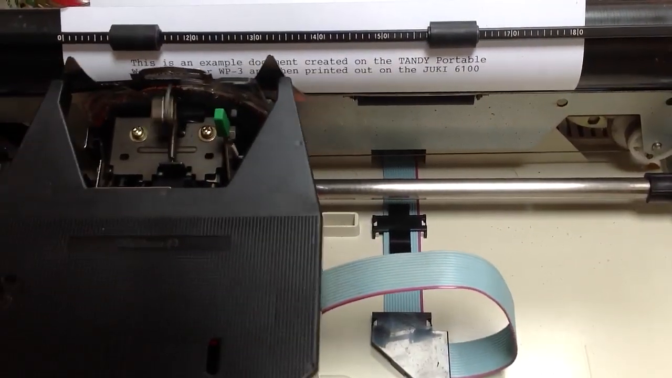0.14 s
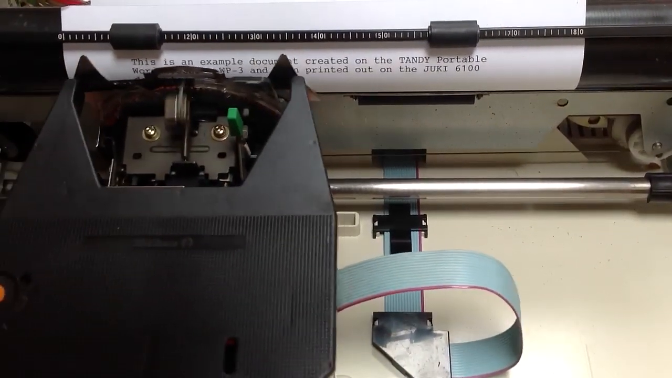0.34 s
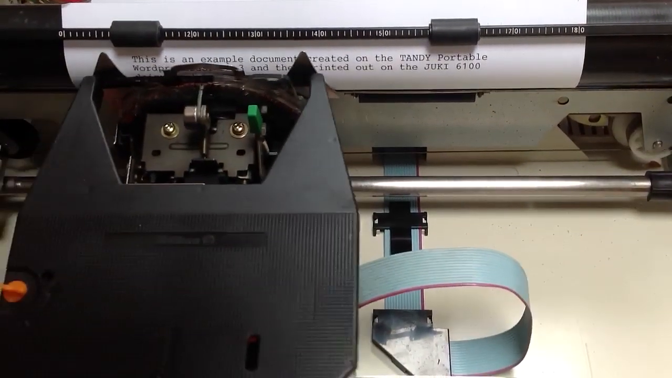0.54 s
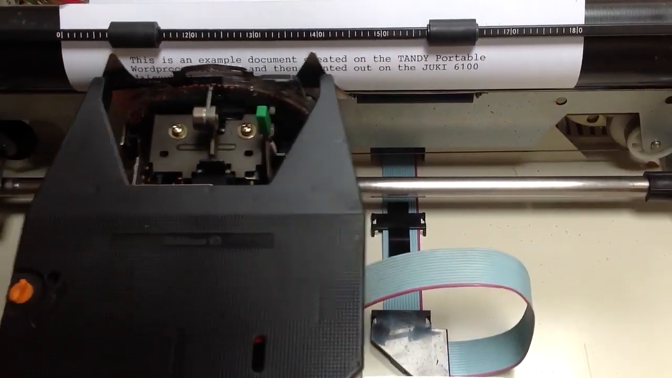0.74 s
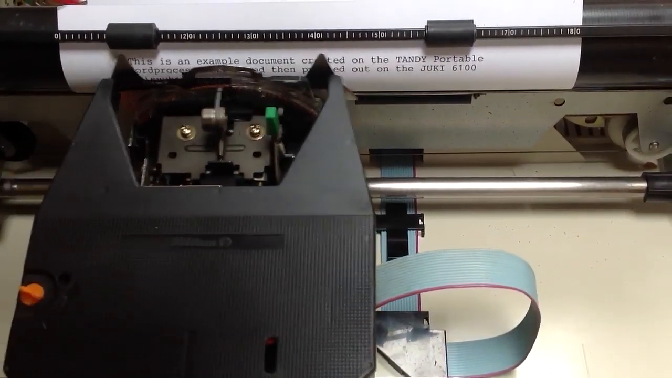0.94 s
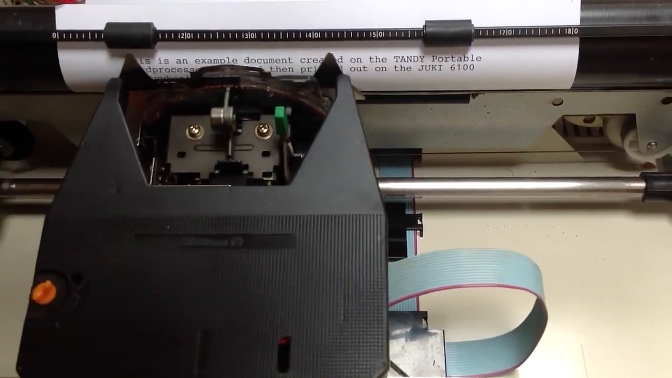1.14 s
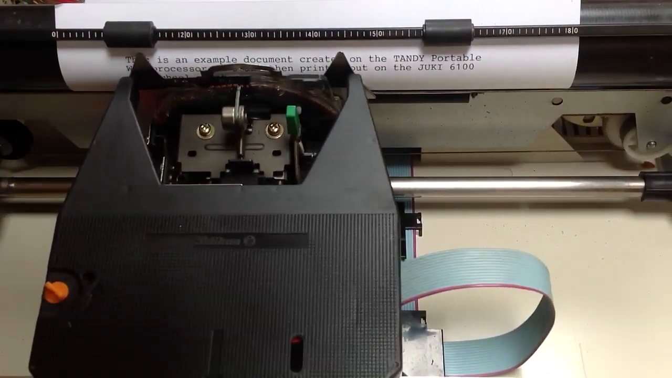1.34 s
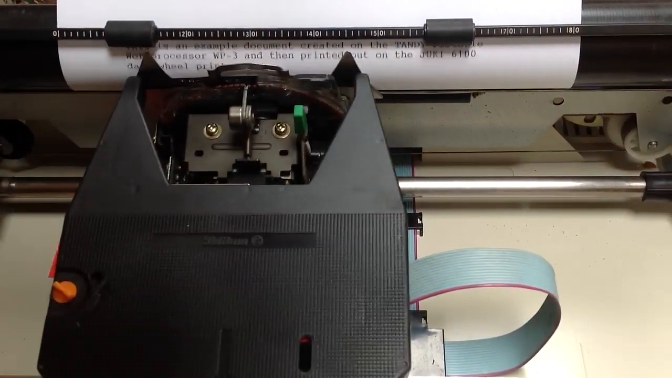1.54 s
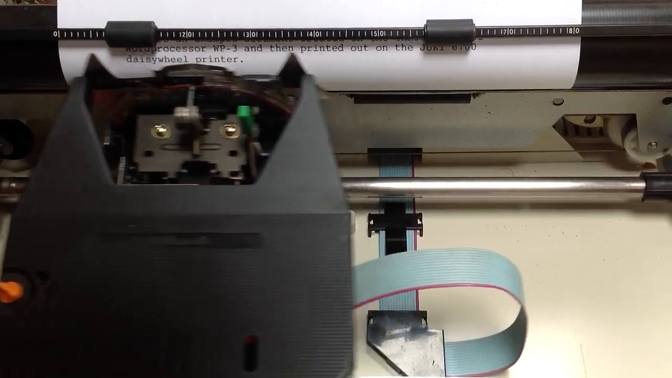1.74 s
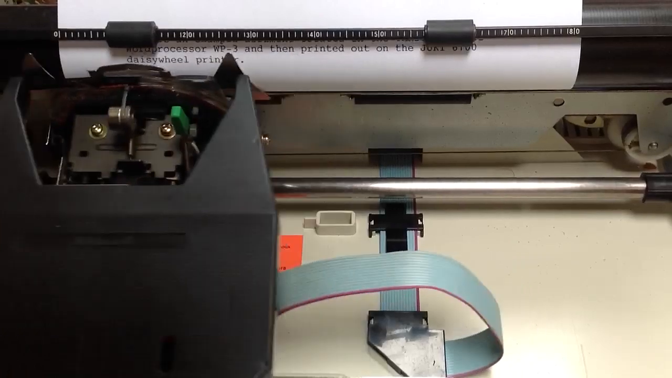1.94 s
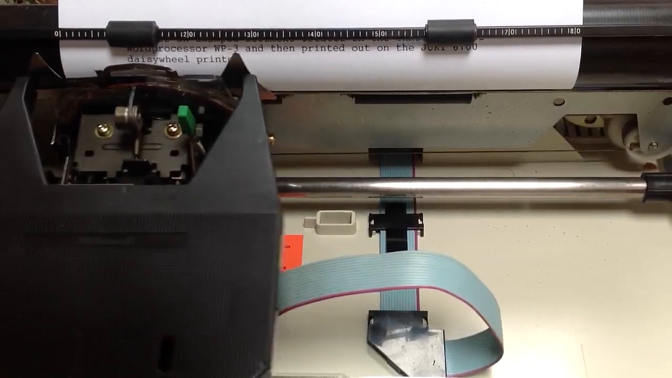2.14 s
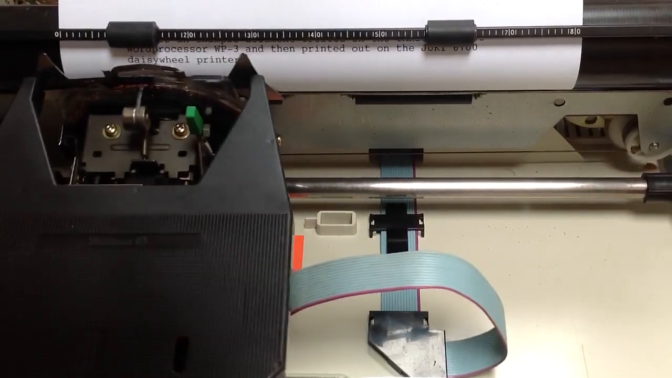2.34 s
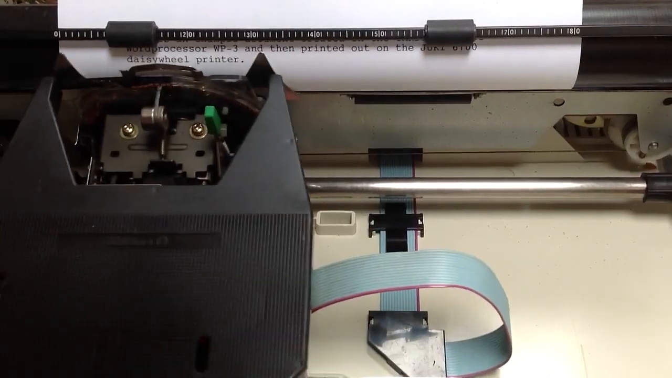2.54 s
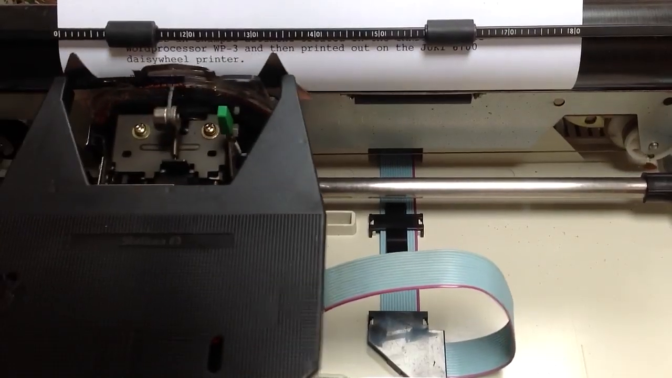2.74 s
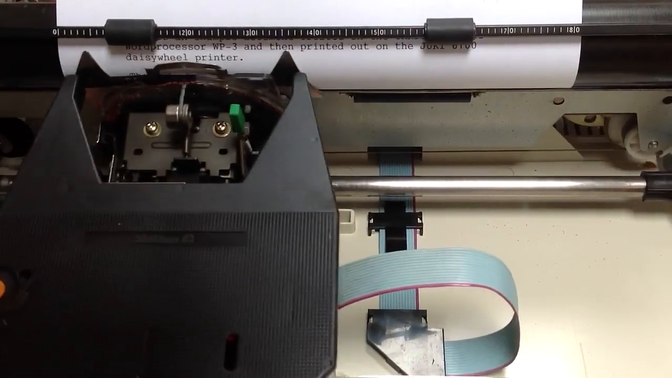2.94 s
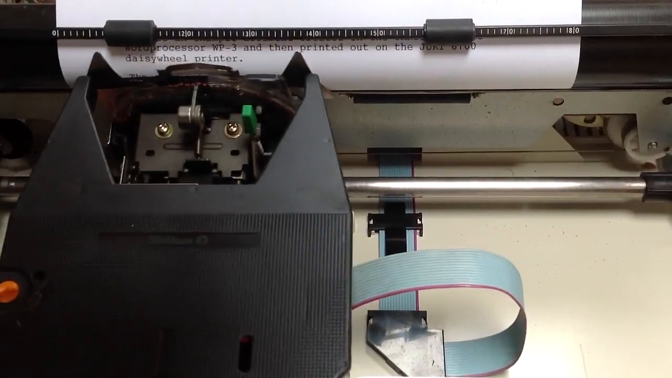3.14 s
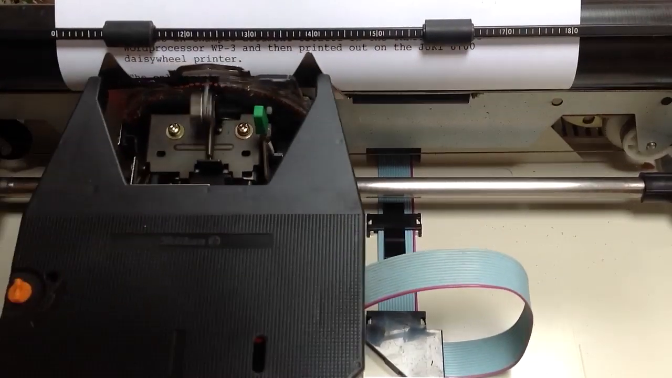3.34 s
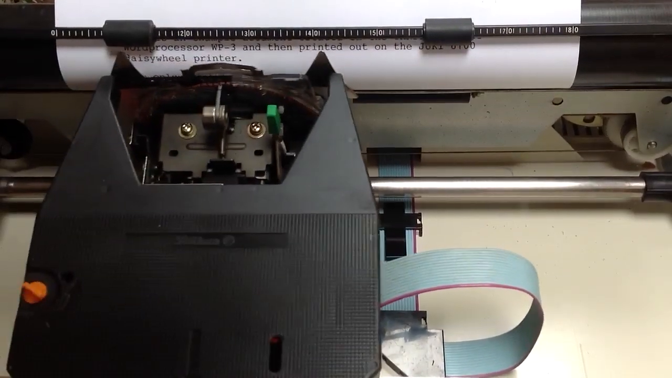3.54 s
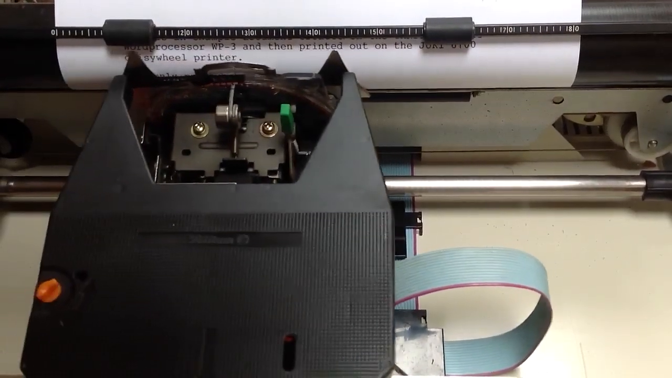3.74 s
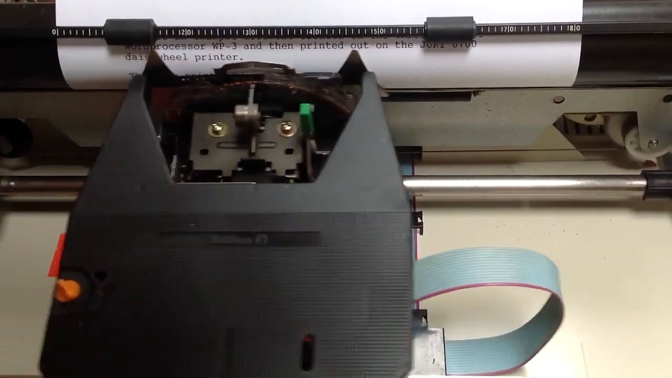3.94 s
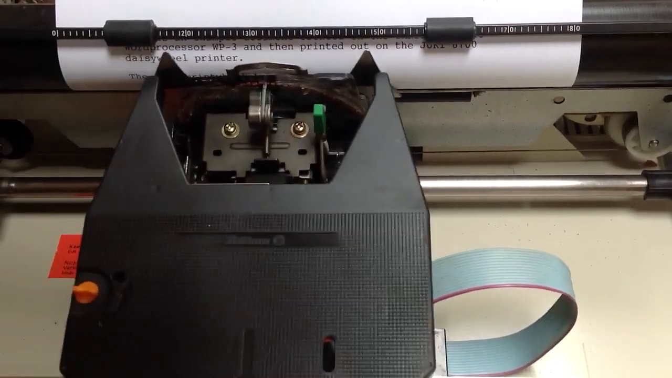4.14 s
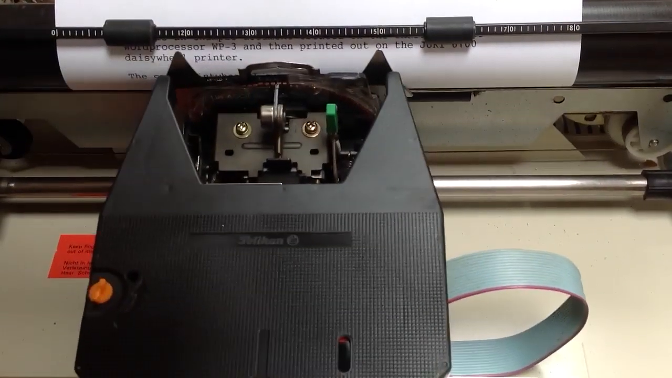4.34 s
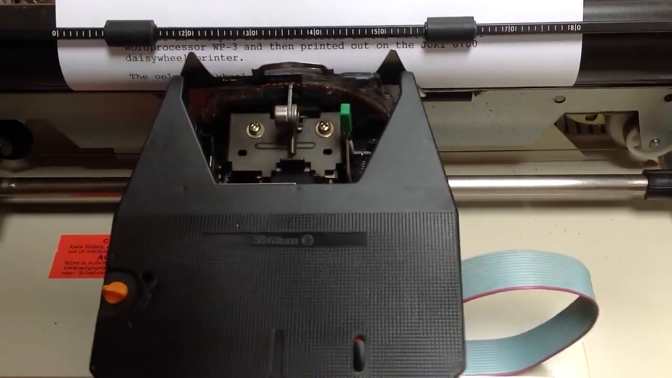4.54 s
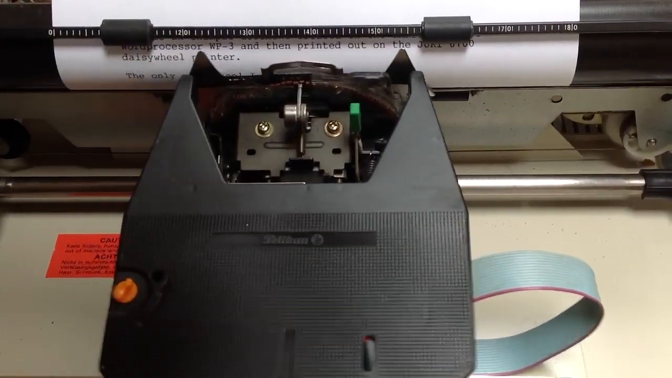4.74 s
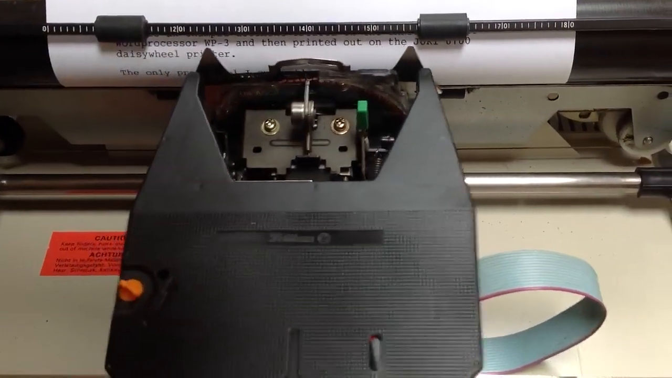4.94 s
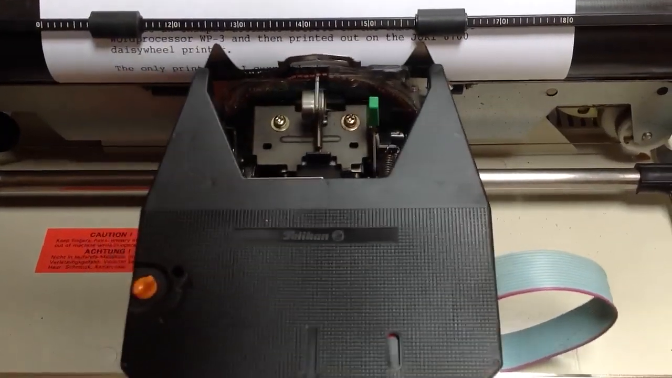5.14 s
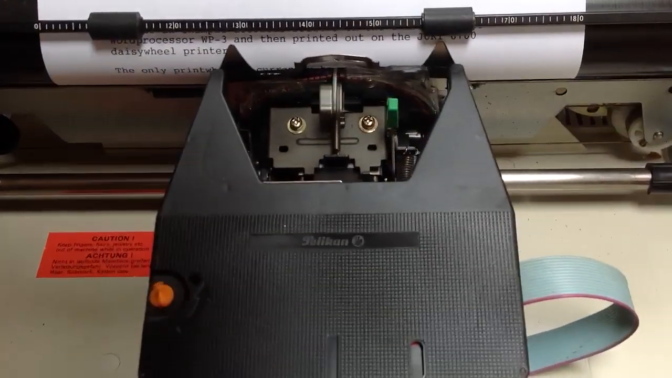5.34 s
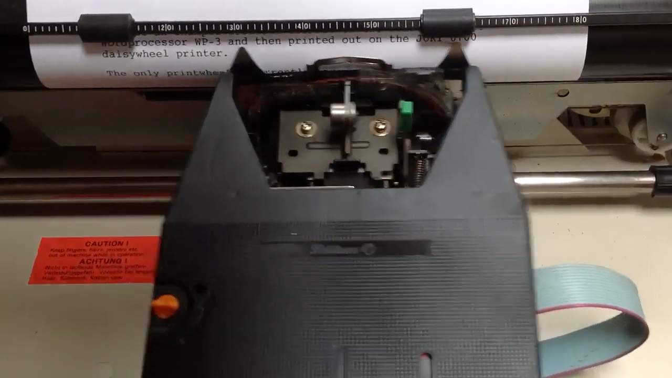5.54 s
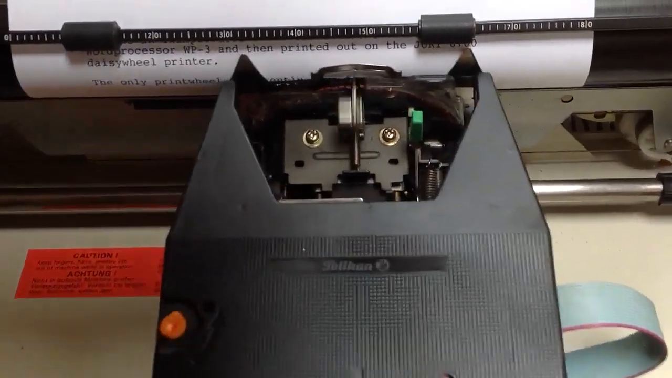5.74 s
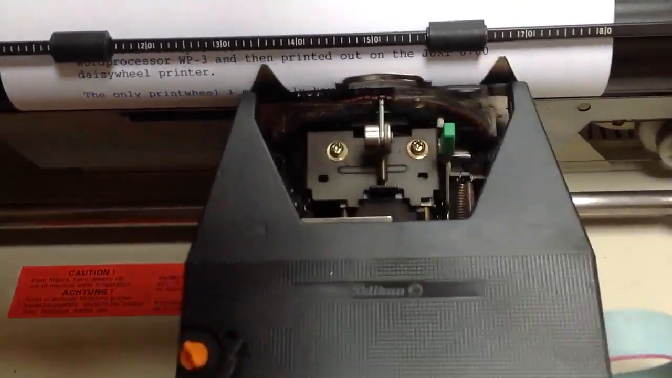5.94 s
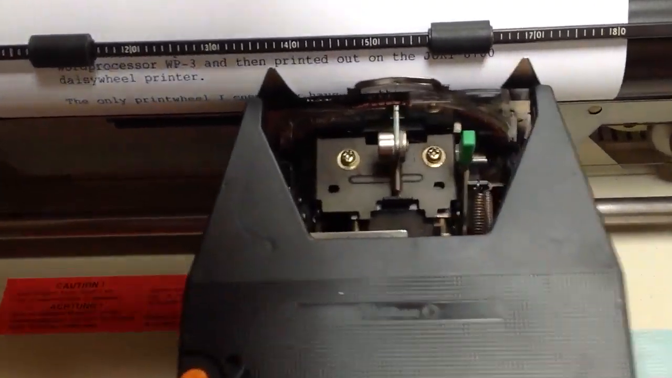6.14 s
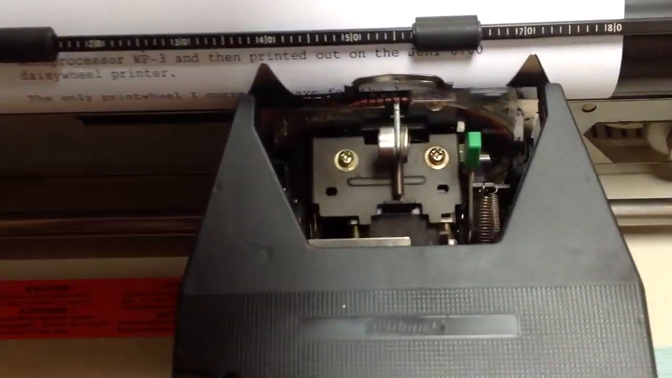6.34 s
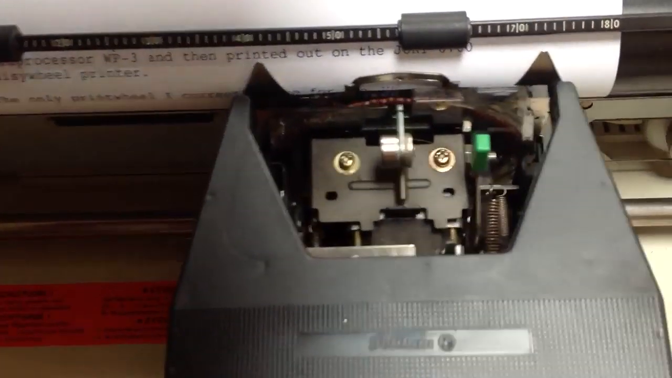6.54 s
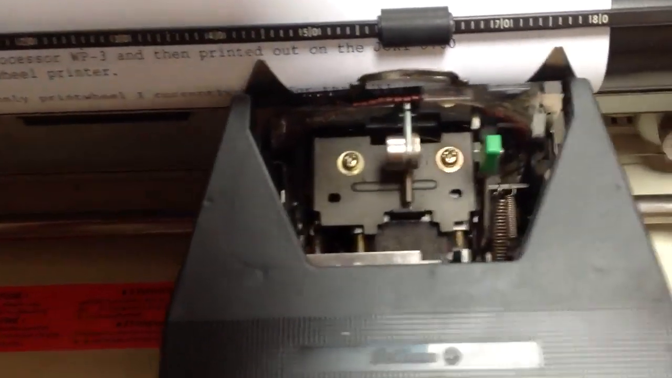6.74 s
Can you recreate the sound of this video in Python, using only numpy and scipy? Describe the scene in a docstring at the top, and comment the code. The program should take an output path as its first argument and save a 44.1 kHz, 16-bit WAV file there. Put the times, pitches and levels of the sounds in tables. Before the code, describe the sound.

Close, bright mechanical typing in quick even runs, with whining servo and carriage rumble, a short line-change gap, then more typing growing louder.

```python
"""A daisywheel printer types two lines of text, close to the microphone in a quiet room, over fan noise.
Line 1: for each letter the carriage rumbles and rubs (noise), the servo sings (swept sine), the mechanism
clicks and the hammer slaps the wheel on the platen and rebounds (coloured bursts, damped modes).
Then the carriage runs back, the paper feeds (swelling chassis noise, one ring), and briefly only the fan is left.
Line 2: typing again, louder towards the end as the microphone nears."""
import sys
import numpy as np
from scipy import signal
from scipy.fft import rfft, irfft, next_fast_len
from scipy.io import wavfile
from scipy.ndimage import uniform_filter1d, map_coordinates

SR = 44100
rng = np.random.default_rng(int(sys.argv[2]) if len(sys.argv) > 2 else 0)


def master(y):
    """Save y as 16-bit WAV."""
    cut = np.clip(np.atleast_2d(y).T, -1, 1)
    pcm = np.round(cut * 32767)  # scale
    wavfile.write(sys.argv[1], SR, pcm.astype(np.int16))


N = 298998
AGE = np.arange(SR // 8) / SR  # time since a contact, s


def amp(db):
    """Decibels to gain."""
    return 10 ** (np.asarray(db) / 20)


def unit(x):
    """Scale to rms 1."""
    return x / np.sqrt(np.mean(x ** 2) + 1e-20)


def sized(x):
    """Scale a short sound to the energy of 10 ms at rms 1."""
    return x * np.sqrt(SR / 100 / np.sum(x ** 2))


def along(points, hz):
    """Interpolate (f/Hz, value) points on a log frequency axis."""
    f, value = np.transpose(points)
    return np.interp(np.log(hz + 1), np.log(f + 1), value)


def at_time(points, s):
    """Interpolate (t/s, value) points."""
    return np.interp(s, *np.transpose(points))


def curves(rows):
    """A soft gate over the time span of the rows, then each column per sample."""
    s, *columns = np.transpose(rows)
    t = np.arange(N) / SR
    gate = uniform_filter1d(1. * ((t >= s[0]) & (t <= s[-1])), size=400)
    return [gate] + [np.interp(t, s, column) for column in columns]


def wobble(rate_hz):
    """A smooth random curve through rate_hz knots a second."""
    knots = rng.standard_normal(int(N * rate_hz / SR) + 4)
    return map_coordinates(knots, [np.arange(N) * rate_hz / SR])


def filtered(x, response):
    """Multiply the spectrum of x by a response of frequency."""
    m = next_fast_len(N + SR // 2)
    return irfft(rfft(x, m) * response(np.fft.rfftfreq(m, 1 / SR)), m)[:N]


def noise(spectrum):
    """Coloured noise of rms 1."""
    return unit(filtered(rng.standard_normal(N), lambda hz: amp(along(spectrum, hz))))


def colour(x, spectrum, treble_db=0, size=8192):
    """Pass a contact through a minimum-phase filter: this spectrum and a treble shelf."""
    hz = np.fft.rfftfreq(size, 1 / SR)
    gain = amp(along(spectrum, hz) + along([(3500, 0.0053), (7000, treble_db)], hz))
    # folded cepstrum: nothing sounds ahead of the contact
    cepstrum = irfft(np.log(gain))
    cepstrum[1:size // 2] *= 2
    cepstrum[size // 2 + 1:] = 0
    response = np.exp(rfft(cepstrum))
    return sized(irfft(rfft(x, size) * response)[:len(x)])


def burst(rise, hold, t60):
    """Small parts chatter and die away; times in s shape the noise before its spectrum is flattened."""
    shape = (1 - np.exp(-AGE / rise)) * amp(-60 * np.maximum(AGE - hold, 0) / t60)
    z = rfft(shape * rng.standard_normal(len(AGE)))
    flat = irfft(z / (np.abs(z) + 1e-9), len(AGE))  # no pitch stands out
    return sized(flat * shape ** 0.16)


def ringing(modes, scatter_db, detune):
    """Damped modes, cut at 40 ms; each contact seats the parts differently, shifting pitch and strength."""
    hz, db, t60_s = np.transpose(modes)[:, :, None]
    age = AGE[:SR // 25]
    hz = hz * (1 + detune * rng.standard_normal(hz.shape))
    level = amp(db + scatter_db * rng.standard_normal(hz.shape) - 60 * age / t60_s)
    phase = rng.uniform(0, 2 * np.pi, hz.shape)
    ring = np.sum(level * np.sin(2 * np.pi * hz * age + phase), axis=0)
    ring = ring * (1 - np.exp(-age / 0.0013))
    return sized(np.pad(ring, (0, len(AGE) - len(age))))


def add(track, s, sound):
    """Mix a sound in at time s."""
    i = round(s * SR)
    a, b = max(i, 0), min(i + len(sound), N)
    if b > a:
        track[a:b] += sound[a - i:b - i]


def near(times, width_s):
    """A smooth bump of height 1 around each time."""
    marks = np.zeros(N)
    for s in times:
        add(marks, s - AGE[-1] / 2, np.exp(-((AGE - AGE[-1] / 2) / width_s) ** 2))
    return marks


# runs of evenly spaced letters; a space or a long turn of the wheel starts a new run: first blow t/s, last blow t/s
RUNS = [(-0.011, 0.0934), (0.2025, 0.5146), (0.6548, 0.8622), (0.9694, 1.285), (2.1559, 2.1564),
        (2.289, 2.3942), (2.5335, 2.845), (2.9857, 3.298), (3.4068, 3.5201), (3.6294, 3.942),
        (4.0822, 4.0822), (4.2229, 4.3256), (4.4353, 4.7468), (4.8549, 5.0636), (5.2046, 5.4175),
        (5.532, 5.532), (5.6724, 5.8797), (6.02, 6.2274), (6.368, 6.3682), (6.495, 6.7068)]
BEAT_S = .105  # usual time from letter to letter


def blow_times():
    """Each run is filled with letters at about the usual beat."""
    return np.concatenate([np.linspace(first, last, round((last - first) / BEAT_S) + 1)
                           for first, last in RUNS])


# gain with microphone distance: t/s, gain/dB
CLOSENESS = [(0, 0), (2.2, -0.84), (4, -0.17), (5.3, 0.1), (6.1, 2.5), (6.7, 3)]
# treble shelf of the blows: t/s, level/dB
BLOW_TREBLE = [(0, -3.5), (1.1, -4.5), (2.3, -7), (2.85, -3.5), (3.4, -6.5), (4.25, -2), (5.25, -4.5),
               (5.9, -2), (6.5, -7)]
BLOW_DB, CLICK_DB = -17.5, -18  # before closeness and scatter
FORCE_SCATTER_DB, PETAL_SCATTER_DB = 0.36, 1.1  # letter to letter: strength, treble


def letters():
    """Rows of t/s, blow/dB, treble/dB, click/dB: nearly constant force, gain set by microphone distance."""
    s = blow_times()
    force, petal, latch = rng.standard_normal((len(s), 3)).T
    close_db = at_time(CLOSENESS, s)
    blow_db = BLOW_DB + close_db + FORCE_SCATTER_DB * force
    treble_db = at_time(BLOW_TREBLE, s) + PETAL_SCATTER_DB * petal
    click_db = CLICK_DB + close_db + FORCE_SCATTER_DB * latch
    return np.transpose([s, blow_db, treble_db, click_db])


# fan air spectrum: f/Hz, relative level/dB per Hz
FAN_AIR = [(18, -71), (30, -42), (65, -43), (107, -16), (216, 0.5), (320, -3), (355, 3), (394, -10),
           (581, -8), (905, -13), (2490, -16.5), (4200, -20.5), (15000, -27)]
# fan tones: f/Hz, rms level/dB
FAN_TONES = [(226.1, -72), (358, -65), (532.9, -76)]


def fan(air_db=-55.5):
    """The cooling fan: soft air noise and a few tones of unsteady phase."""
    t = np.arange(N) / SR
    tones = sum(amp(db) * np.sqrt(2) * np.sin(2 * np.pi * hz * t + 0.32 * wobble(13))
                for hz, db in FAN_TONES)
    return amp(air_db) * noise(FAN_AIR) + tones


# carriage drive, one table per line: t/s, rumble level/dB, rub level/dB, cover ring level/dB
DRIVE = [
    [(0, -41, -32.5, -61), (1.2, -42, -33, -52), (1.42, -45, -29.5, -52)],
    [(2.14, -41, -33.5, -55), (3.5, -41.5, -33, -56.5), (5.2, -42, -32.5, -45.5), (6.1, -41, -33.5, -43.5),
     (6.78, -40.5, -31.5, -41)],
]
# drive rumble spectrum: f/Hz, relative level/dB per Hz
RUMBLE = [(35, -65), (60, -43), (92, -19), (130, -19.5), (150, -18.5), (192, -4), (231, -7), (275, 2),
          (309, 0.5), (371, -12.5), (445, 0.5), (485, 0.5), (524, -14.5), (600, -6), (780, -22),
          (1320, -120)]
# drive rub spectrum: f/Hz, relative level/dB per Hz
RUB = [(290, -39), (500, -8), (666, 3), (914, -4.5), (1120, 1), (1390, 5), (3010, 6.5), (3380, 3.5),
       (6930, -2), (9510, -1.5), (12700, -4.5), (14600, -22), (15500, -8)]


def carriage(rest_db=-8, pause_db=-6, cover_hz=1215, cover_width_hz=80):
    """The drive rumbles, rubs and rings the cover; it settles before each blow and eases off after a space."""
    blows = blow_times()
    rest = near(blows - .01, width_s=0.011)
    after_space = blows[1:][np.diff(blows) > .12]
    pause = near(after_space - .045, width_s=0.0073)
    rumble = noise(RUMBLE) * amp(rest_db * rest + pause_db * pause + 1.5 * wobble(40))
    rub = noise(RUB) * amp(pause_db * pause + 2.5 * wobble(60) + 1.54 * wobble(600))
    # two-pole resonance driven by the rub
    cover = unit(filtered(rub, lambda hz: 1 / (1 + 1j * (hz - cover_hz) / cover_width_hz) ** 2))
    out = np.zeros(N)
    for gate, rumble_db, rub_db, cover_db in map(curves, DRIVE):
        out += gate * (amp(rumble_db) * rumble + amp(rub_db) * rub + amp(cover_db) * cover)
    return out


# servo whine during one letter step: t after the blow/s, f/Hz, level/dB
STEP = [(-.04, 1710, -65), (-.032, 1660, -42), (-.01, 1510, -37.5), (.012, 1300, -61), (.035, 1133, -45),
        (.05, 1083, -57)]
# other glides: two servo runs between the lines, then a short rising groan of ribbon or carriage:
# t/s, f/Hz, level/dB
GLIDES = [
    [(1.41, 1250, -39), (1.445, 1550, -45), (1.49, 1305, -42), (1.52, 1350, -54), (1.59, 1370, -52),
     (1.65, 1200, -51)],
    [(2.04, 1110, -54), (2.058, 1420, -44), (2.072, 1437, -33), (2.09, 1436, -49), (2.11, 1556, -38),
     (2.14, 1450, -47)],
    [(6.415, 189.7, -43), (6.432, 286, -36), (6.444, 458, -34), (6.455, 483, -54)],
]


def servo():
    """The servo sings a rough falling note per letter and glides between the lines; one short groan rises late."""
    steps = [(s + delay, hz, db) for s in blow_times() for delay, hz, db in STEP]
    out = np.zeros(N)
    for gate, hz, db in map(curves, [steps] + GLIDES):
        phase = 2 * np.pi * np.cumsum(hz * (1 + .05 * wobble(600))) / SR
        judder_db = 4 * wobble(170)
        running = np.clip((db + 59) / 4, 0, 1)  # silent below -59 dB
        out += gate * running * amp(db + judder_db) * np.sin(phase)
    return out


# modes of the small steel parts: f/Hz, relative level/dB, t60/s, shortened further in steel()
STEEL = [(1217, -7, 0.028), (1605, -2.5, 0.037), (2430, -5.5, 0.024), (3070, -14, 0.045),
         (4495, -4.5, 0.081), (5090, -2, 0.021), (7680, -4.5, 0.028), (8450, 2.5, 0.036), (9410, 1, 0.082),
         (11130, 2, 0.049), (12050, 0, 0.025), (14400, 6, 0.026)]


def steel():
    """One short ring of the small steel parts, with an extra fast decay."""
    ring = ringing(STEEL, scatter_db=3, detune=.028)
    return sized(ring * amp(-60 * AGE / .03))


# click spectrum: f/Hz, relative level/dB
CLICK = [(150, -39), (800, -8), (1200, -8.5), (1600, -8.5), (3000, -5), (4000, -7), (5500, -3), (6500, 0.5),
         (7500, -1), (10000, -3.5), (11800, -7), (14500, 3)]
# treble shelf of the clicks, brightest around 5.2 s: t/s, level/dB
CLICK_TREBLE = [(0, -1.5), (5.2, 0.5), (6.5, -0.5)]
# spectrum of the smaller contacts: f/Hz, relative level/dB
RATTLE = [(150, -38), (400, -8.5), (800, -4.5), (1250, 2.5), (2600, -4.5), (4500, -1.5), (7200, -3.5),
          (9600, -4), (12500, -3.5), (15000, -5.5)]
# clicks as the first line ends: t/s, level/dB, treble shelf/dB
LINE_END = [(1.354, -19, 1), (1.3714, -18, 2), (1.3906, -18.5, -4)]


def mechanism(typed, lead_s=.0347, steel_db=-6, rebound_ring_db=-7):
    """A bright click precedes each blow; smaller contacts come just before and after the blow at nearly fixed
    delays."""
    out = np.zeros(N)
    # settling and rebounds: t after the blow/s, level re blow/dB
    contacts = [(-.0225, -12.5), (-.0105, -13), (.009, -11.5), (.017, -12), (.027, -9.5),
                (.034, -16), (.043, -22.5)]

    def snap():
        return burst(rise=0.00084, hold=0.0032, t60=0.023)

    path = snap()  # part common to all clicks

    def click(treble_db):
        return colour(path + 1.3 * snap(), CLICK, treble_db) + amp(steel_db) * steel()

    for s, blow_db, _, click_db in typed:
        add(out, s - lead_s, amp(click_db) * click(at_time(CLICK_TREBLE, s)))
        for delay, rel_db in contacts:
            chatter = colour(burst(rise=0.00095, hold=0.0008, t60=0.08), RATTLE, treble_db=1.5)
            chatter = chatter + amp(rebound_ring_db) * steel()
            level = amp(blow_db + rel_db + rng.normal(0, 1.23))
            add(out, s + delay + rng.normal(0, .001), level * chatter)
    for s, db, treble_db in LINE_END:
        add(out, s, amp(db) * click(treble_db))
    return out


# modes of platen and frame: f/Hz, relative level/dB, t60/s
FRAME = [(493, -5, 0.017), (681, -3.5, 0.047), (828, -5, 0.044), (990, -35, 0.012), (1130, 8, 0.025),
         (1636, -21, 0.058), (1803, 6, 0.031), (2168, -2.5, 0.035), (2390, 5.3, 0.021), (2552, 8.5, 0.016),
         (3005, 8.5, 0.025), (4380, 2, 0.0086), (5445, -13, 0.025), (5820, -6, 0.029), (6630, -19, 0.02),
         (7640, -12, 0.02), (9560, 7, 0.019), (12000, 2, 0.034)]
# blow spectrum: f/Hz, relative level/dB
BLOW = [(100, -32), (300, -20), (470, -14.5), (900, -9.5), (1200, -6.5), (2200, 1), (3000, -7),
        (3700, -3.5), (4700, 1), (7200, -2.5), (8300, 2), (9600, 3.5), (12800, -3), (15000, 0)]


def hammer(typed, ring_db=-4, crack_db=3, thud_db=-37.5, thud_hz=97, flex_db=-14, fresh=0.76):
    """Blows share much of one path through the machine, but each type petal slaps a little differently."""
    out = np.zeros(N)

    def slap():
        return burst(rise=0.00019, hold=.0042, t60=0.044)

    path = slap()
    frame = ringing(FRAME, scatter_db=0, detune=0)
    # the heavy carriage answers slowly
    thud = amp(thud_db) * np.sin(2 * np.pi * thud_hz * AGE) * np.exp(-((AGE - .024) / 0.014) ** 2)
    # bending waves in the chassis: the lower ones arrive later
    flex_hz = 220 + 750 * np.exp(-AGE / 0.01317)
    flex_shape = (AGE / 0.0087) * np.exp(1 - AGE / 0.0054)
    flex = amp(flex_db) * np.sin(2 * np.pi * np.cumsum(flex_hz) / SR) * flex_shape
    for s, db, treble_db, _ in typed:
        crack = colour(path + fresh * slap(), BLOW, treble_db)
        ring = sized(frame + .5 * ringing(FRAME, scatter_db=6.0, detune=0.018))
        add(out, s, amp(db) * (amp(crack_db) * crack + amp(ring_db) * ring + thud + flex))
    return out


# carriage and paper movements between the lines: t/s, level/dB, rise/s, fall/s
MOVES = [(1.42, -33, 0.018, 0.024), (1.485, -46, 0.033, .03), (1.54, -34.5, 0.035, 0.018),
         (1.612, -49, 0.022, 0.034), (1.664, -34, 0.008, 0.015), (1.989, -43, 0.0049, .01),
         (2.012, -31.5, 0.01, 0.011), (2.068, -41.5, 0.018, 0.008), (2.1, -46, .04, 0.038)]
# chassis spectrum: f/Hz, relative level/dB per Hz
CHASSIS = [(41, -75), (70, -43), (172, -12.5), (252, -10), (315, -4.5), (395, -11), (632, -7), (809, -17.5),
           (1900, -12), (2030, -8.5), (2380, -13.5), (2540, -10), (2780, -10), (3480, -16), (15000, -23)]


def new_line():
    """The carriage runs back and the paper feeds; each movement shakes the chassis (noise swell)."""
    t = np.arange(N) / SR
    power = sum(amp(db) ** 2 * np.exp(-((t - s) / np.where(t < s, rise, fall)) ** 2)
                for s, db, rise, fall in MOVES)
    return np.sqrt(power) * unit(noise(CHASSIS) * amp(1.8 * wobble(400)))


# ring as the paper feed engages: t/s, level/dB, f/Hz, t60/s
FEED_KNOCK = (1.5, -39, 2600, 0.15)


def feed_ring():
    """The paper feed engages with a short metallic ring: one damped sine."""
    s, db, hz, t60_s = FEED_KNOCK
    tone = np.sqrt(2) * np.sin(2 * np.pi * hz * AGE)
    envelope = amp(-60 * AGE / t60_s) * (1 - np.exp(-AGE / .002))
    out = np.zeros(N)
    add(out, s, amp(db) * tone * envelope)
    return out


# room decay: f/Hz, t60/s
ROOM = [(200, 0.35), (1500, 0.13), (5000, 0.11), (14000, 0.22)]


def room(x):
    """A short diffuse tail, 5 ms late: noise decaying at its own rate in each band, slowest in the lows."""
    hz, t, z = signal.stft(rng.standard_normal(SR // 2), SR, nperseg=256)
    decay = amp(-60 * t / along(ROOM, hz)[:, None])
    tail = signal.istft(z * decay, SR, nperseg=256)[1]
    return signal.fftconvolve(np.pad(x, (SR // 200, 0)), tail / np.linalg.norm(tail))[:N]


def scene():
    """The printer, heard close to its carriage, with its room tail and fan."""
    typed = letters()
    printer = carriage() + servo() + mechanism(typed) + hammer(typed) + new_line() + feed_ring()
    return (printer + amp(-13) * room(printer) + fan())[None]


def record(dry, low_hz=95, top_hz=15400):
    """The microphone drops the deep bass and keeps nothing above its band limit."""
    lean = signal.sosfilt(signal.butter(1, low_hz, "highpass", fs=SR, output="sos"), dry[0])
    return filtered(lean, lambda hz: np.clip((top_hz - hz) / 300 + .5, 0, 1))[None]


dry = scene()
out = record(dry)
master(out)
```